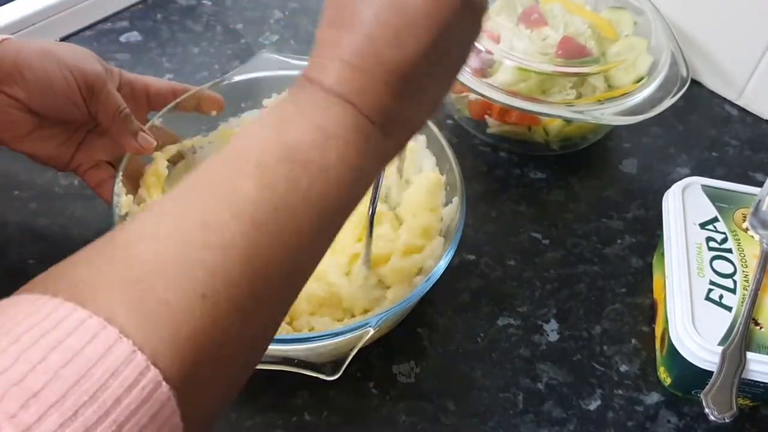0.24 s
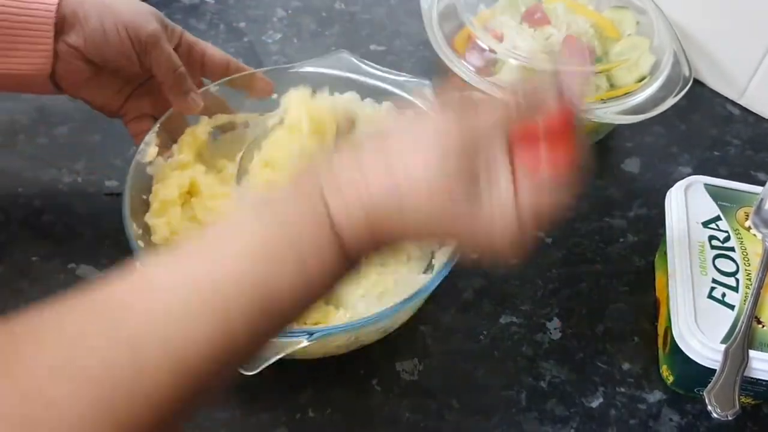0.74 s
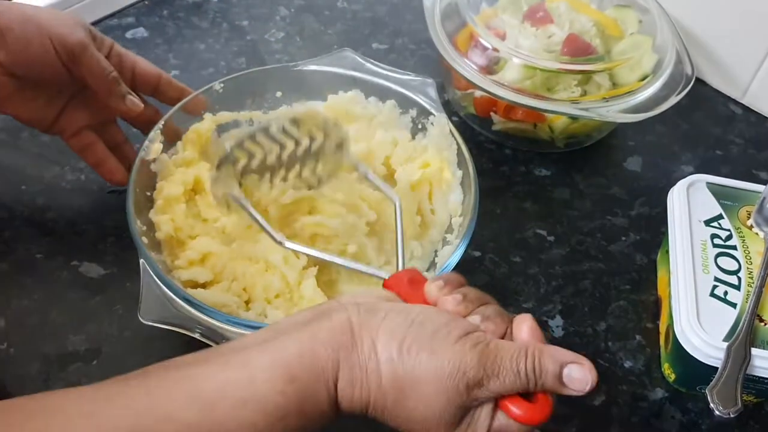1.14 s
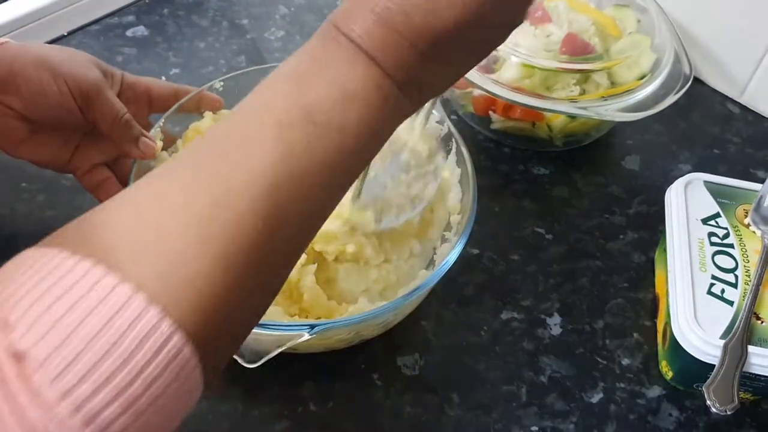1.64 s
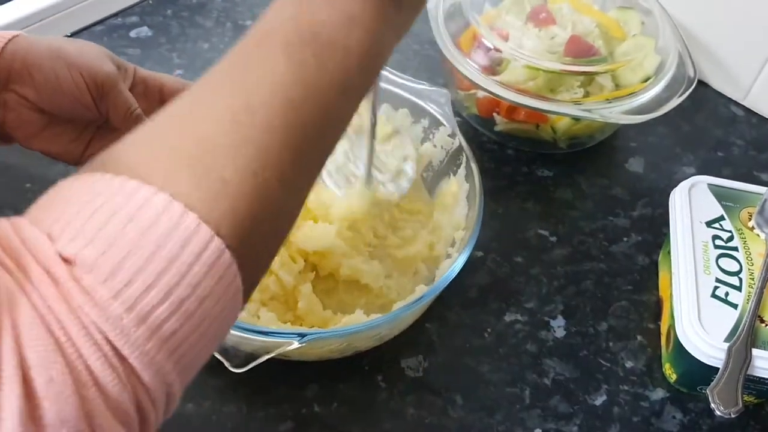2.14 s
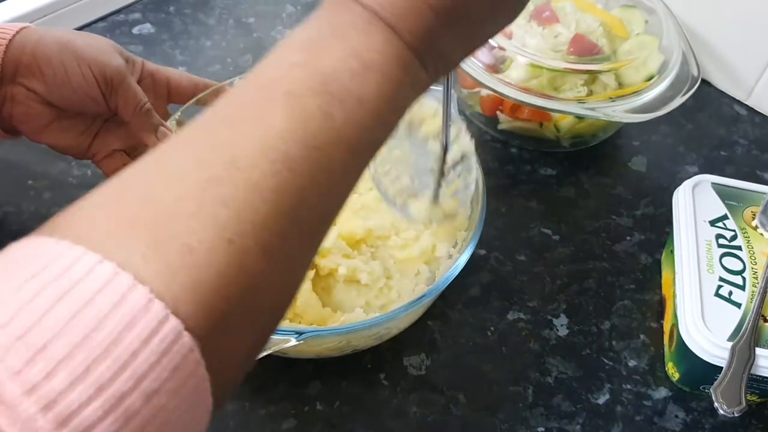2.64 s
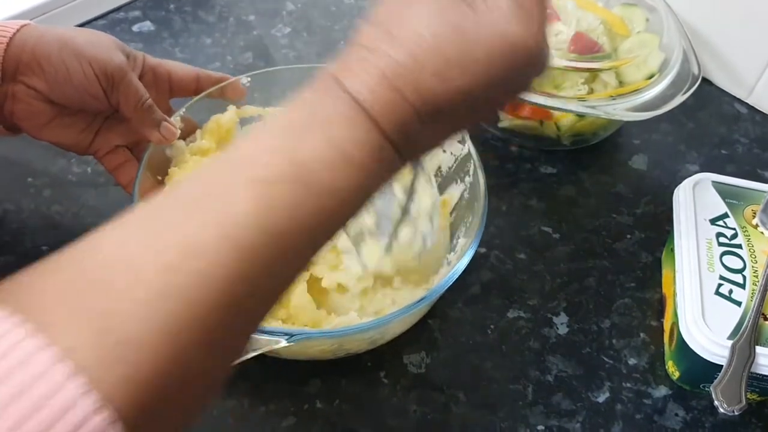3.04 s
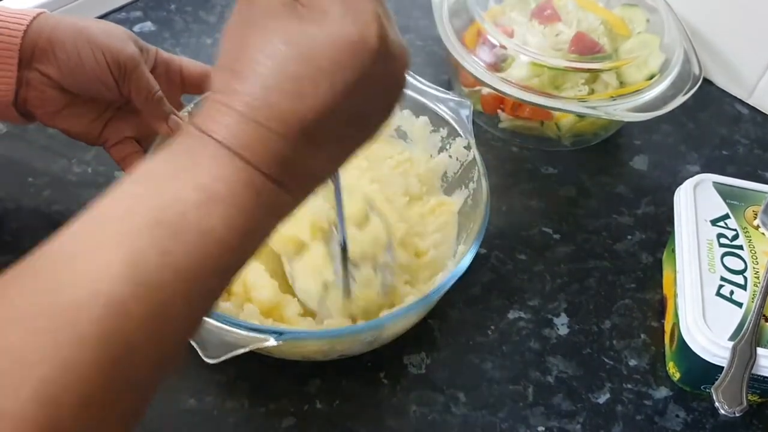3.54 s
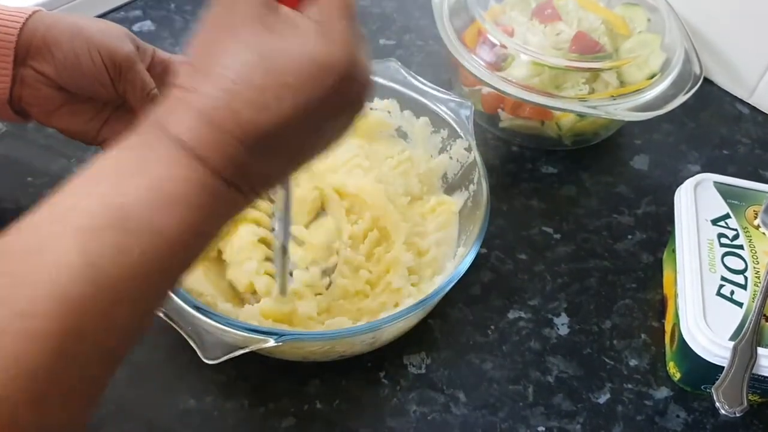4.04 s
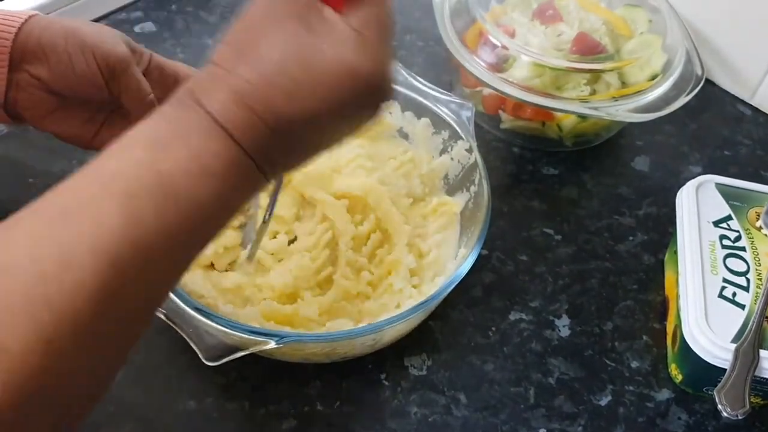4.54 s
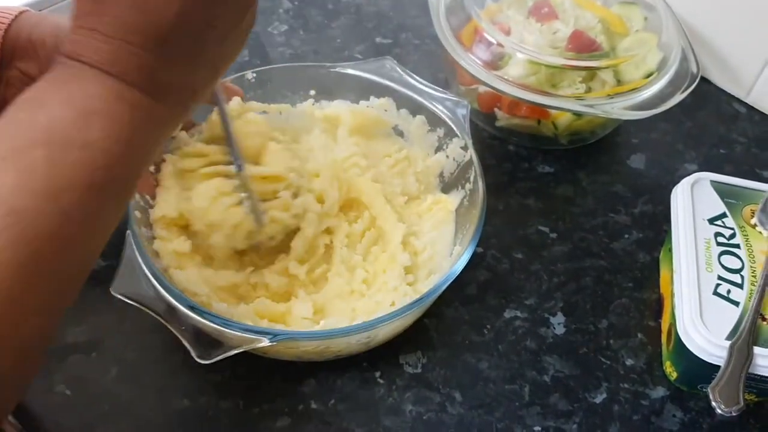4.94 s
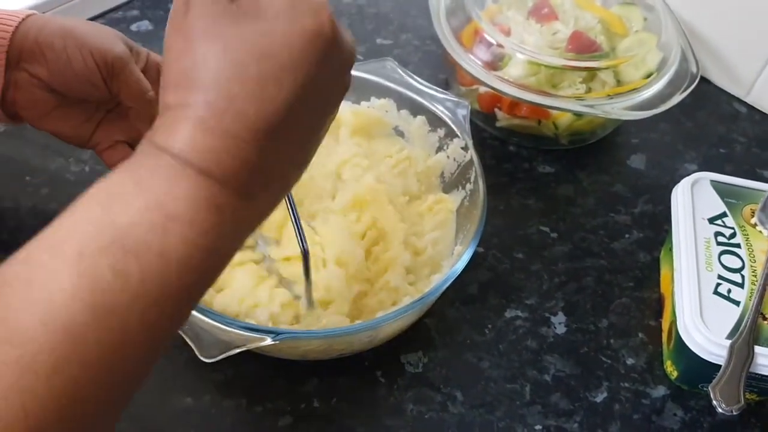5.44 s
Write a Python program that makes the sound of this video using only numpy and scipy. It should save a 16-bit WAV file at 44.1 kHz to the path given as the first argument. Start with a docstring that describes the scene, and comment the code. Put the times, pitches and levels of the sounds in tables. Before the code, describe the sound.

Boiled potatoes mashed in a glass bowl with a steel masher: dull thumps, a few glassy clinks and soft wet squelches in a quiet kitchen.

```python
"""In a small kitchen, boiled potatoes are mashed in a glass bowl on the worktop, close to a two-port microphone.
The steel masher thumps through the potato into bowl and worktop: filtered bursts, dying tones and a low swing.
Steel clinks on glass are bursts with dying tones; wet mash squelches as random clicks and tiny ringing bubbles.
Air pockets pop as a snap plus a short note. Each of these gets a short room echo of shaped noise.
Underneath lies faint kitchen air: noise coloured into a low hum and a thin hiss."""
import sys
import numpy as np
from scipy import signal
from scipy.fft import rfft, irfft
from scipy.io import wavfile
from scipy.ndimage import uniform_filter1d

SR = 44100
rng = np.random.default_rng(int(sys.argv[2]) if len(sys.argv) > 2 else 0)


def bounce(signal):
    """Save signal as a 16-bit WAV file at the path given by the first command-line argument."""
    frames = np.transpose(np.atleast_2d(signal))
    limited = np.clip(frames, -1, 1)
    pcm = np.round(limited * 32767).astype(np.int16)
    wavfile.write(sys.argv[1], SR, pcm)


N = 251370  # length of the scene in samples
HZ = np.fft.rfftfreq(8192, 1 / SR)  # frequencies at which filter gains are given
T = np.arange(SR * 3 // 5) / SR  # time within one short sound, in seconds


def amp(db):
    """Turns decibels into a gain."""
    return 10 ** (np.asarray(db) / 20)


def read(points, hz):
    """Reads between the points of a (f/Hz, value) table, on a log-frequency axis."""
    f, value = np.transpose(points)
    return np.interp(np.log(hz + 1), np.log(f + 1), value)


def add(mix, s, sound):
    """Lays a stereo sound into the mix, starting at s seconds."""
    start = max(round(s * SR), 0)
    part = mix[:, start:][:, :sound.shape[1]]
    part += sound[:, :part.shape[1]]  # writes into the mix itself


def colour(x, db):
    """Filters x with the gain db over HZ, without sounding ahead of time (minimum phase)."""
    cepstrum = irfft(db * np.log(10) / 20)
    half = len(cepstrum) // 2
    # folding the second half onto the first makes the filter causal
    cepstrum[1:half] *= 2
    cepstrum[half + 1:] = 0
    response = irfft(np.exp(rfft(cepstrum)))[None, :half]
    return signal.oaconvolve(x, response, axes=1)[:, :x.shape[1]]


def band_rms(x, band):
    """Measures the level of a stereo sound's centre within a band (low Hz, high Hz)."""
    sos = signal.butter(2, band, "band", fs=SR, output="sos")
    return np.std(signal.sosfilt(sos, x.mean(0)))


def diffuse(size):
    """Noise from all sides: alike at both ports in the bass, unrelated in the treble."""
    port_gap_m, sound_speed_m_per_s = 0.17, 343
    a, b = rfft(rng.standard_normal((2, size)))
    same = np.sinc(2 * np.fft.rfftfreq(size, 1 / SR) * port_gap_m / sound_speed_m_per_s)
    near, apart = np.sqrt((1 + same) / 2), np.sqrt((1 - same) / 2)
    return irfft([near * a + apart * b, near * a - apart * b], size)


def kitchen(direct_db, early_db, early_s, tail_db, lag_s):
    """Direct sound, quick scatter from worktop and tiles, and a tail that dies band by band."""
    # how long the room takes to die away by 60 dB: (f/Hz, t60/s)
    room_t60 = [(60, 0.34), (150, 0.19), (500, 0.31), (1500, 0.27), (2500, 0.26), (4000, 0.28), (8000, 0.2),
                (16000, 0.53)]
    hz, t, z = signal.stft(diffuse(len(T)), SR, nperseg=256)
    fading = z * amp(-60 * t / read(room_t60, hz)[:, None])
    tail = signal.istft(fading, SR, nperseg=256)[1][:, :len(T)]
    tail *= 1 - np.exp(-T / 0.0026)
    early = diffuse(len(T)) * np.exp(-T / early_s) * (1 - np.exp(-T / 0.0013))
    # the second port hears the direct sound lag_s later
    direct = np.sinc((T - np.array([[0], [abs(lag_s)]])) * SR - 2)
    parts = [(direct_db, direct), (early_db, early), (tail_db, tail)]
    paths = sum(amp(db) * p / np.linalg.norm(p[0]) for db, p in parts)
    # many paths together leave a fine ripple but no broad colour
    power = uniform_filter1d((abs(rfft(paths, 8192)) ** 2).mean(0), size=21)
    return colour(paths, -10 * np.log10(power))


def air():
    """Low hum and thin hiss of the still kitchen: coloured noise whose level swells slightly."""
    # how strong the noise is at each pitch, before its overall level is set: (f/Hz, density/dB per Hz)
    air_colour = [(20, -14), (40, -6), (58, 6), (80, -6.5), (120, -5.5), (180, -12.5), (300, -10),
                  (500, -21), (780, -24.5), (950, -38), (1200, -29), (1500, -22.5), (2200, -21.5),
                  (3200, -31), (6000, -35), (8400, -30), (9600, -47), (16000, -48)]
    level_db, swell_db = -62, 1.0  # average level; size of each slow wave in it
    spectrum = rfft(diffuse(N)) * amp(read(air_colour, np.fft.rfftfreq(N, 1 / SR)))
    noise = irfft(spectrum, N)
    t = np.arange(N) / SR
    swell = sum(np.sin(2 * np.pi * (f * t + rng.random())) for f in np.geomspace(.4, 5, 8))
    return amp(level_db + swell_db * swell) * noise / noise.std()


def pops():
    """A larger air pocket bursts: a wet snap centred on a short note."""
    # air pockets bursting in the mash: (t/s, peak level/dB, note f/Hz, note t60/s)
    air_pockets = [(0.023, -50, 1852, 0.073), (0.2185, -44, 3556, 0.071), (0.997, -43, 3170, 0.016),
                   (1.1004, -47.5, 5400, 0.011), (1.9079, -29.5, 2560, 0.022), (2.4104, -53.5, 1837, 0.06),
                   (3.2176, -59, 1336, 0.038), (3.259, -49, 3740, 0.02), (3.502, -42.5, 2900, 0.062),
                   (3.7788, -42.5, 2160, 0.021), (3.8153, -40.5, 3190, 0.054), (3.8788, -40, 3730, 0.017),
                   (3.978, -55, 2950, 0.019), (4.2692, -37, 3290, 0.0073), (4.2951, -43, 2370, 0.034),
                   (4.546, -49, 1332, 0.066), (4.753, -50.5, 8230, 0.023), (4.802, -48.5, 1497, 0.086),
                   (4.958, -52, 1420, 0.05), (5.1283, -43.5, 3330, 0.019), (5.4778, -38.5, 2644, 0.066)]
    out = np.zeros((2, N))
    for s, db, hz, t60 in air_pockets:
        note = amp(-6 - 60 * T / t60) * np.sin(2 * np.pi * hz * T)
        snap = np.exp(-T / 0.00072) * rng.standard_normal(len(T))
        # the snap loses 13 dB per octave away from the note
        burst = note + colour(snap[None], 7 - 13 * abs(np.log2((HZ + 100) / hz)))
        room = kitchen(direct_db=-9.0, early_db=3.5, early_s=0.0019, tail_db=-8.5, lag_s=.00005)
        sound = signal.fftconvolve(burst, room, axes=1)[:, :len(T)]
        add(out, s, amp(db) * sound / abs(sound).max())
    return out


def crackle(per_s, spread_db):
    """Random clicks, most of them near the smallest size and a few larger."""
    size = amp(spread_db * np.minimum(rng.exponential(1, N), 4))
    happens = rng.random(N) < per_s / SR
    return size * rng.choice([-1, 1], N) * happens


def bubbles(per_s, cycles, count):
    """Tiny cavities open in the mash; each rings for a few cycles, rising in pitch."""
    out = np.zeros(N)
    t = T[:SR // 50]
    for hz in np.linspace(1500, 7000, count) * rng.uniform(.94, 0.98, count):
        grain = np.exp(-t * hz / cycles) * np.sin(2 * np.pi * hz * t * (1 + 6 * t))
        clicks = crackle(per_s / count, spread_db=2.5)
        out += signal.oaconvolve(clicks, grain / np.linalg.norm(grain))[:N]
    return out


def squeeze_gains():
    """Each squeeze sets in, swells or slackens while the plate moves, then dies away: (fizz, smack) gains."""
    # mash squeezing through the plate, with fizz and smack levels relative to their layers:
    # (start t/s, length/s, attack/s, fine fizz level/dB, wet smack level/dB, swell from start to end/dB)
    squeezes = [(0.152, 0.11, 0.095, -69.5, -61, -5.5), (0.276, 0.057, 0.019, -78, -64, 4),
                (0.388, 0.18, 0.16, -75, -64, 13.5), (0.948, 0.049, 0.011, -73, -82, -3),
                (1.068, 0.053, 0.036, -75, -92, -6.5), (1.61, 0.13, 0.03, -72.5, -62, 6.5),
                (1.787, 0.059, 0.01, -81, -70, 2), (1.878, 0.04, 0.024, -69, -53.5, 3),
                (2.158, 0.027, 0.017, -69, -63, -3), (2.36, 0.096, 0.047, -68.5, -69, 5),
                (2.831, 0.16, 0.02, -74, -74, 15), (3.213, 0.12, 0.005, -70.5, -57.5, 12),
                (3.351, 0.022, 0.03, -59.5, -63.5, -9.5), (3.457, 0.062, 0.011, -63.5, -58, 5.5),
                (3.748, 0.066, 0.004, -63.5, -63, -1.5), (3.853, 0.018, 0.022, -72, -57.5, -0.5),
                (3.947, 0.076, 0.033, -71.5, -61.5, 9.5), (4.255, 0.13, 0.051, -64, -54.5, -8),
                (4.423, 0.14, 0.062, -69, -62, 3.5), (4.869, 0.1, 0.019, -76, -69, 19.5),
                (5.029, 0.12, 0.024, -66, -62.5, 1.5), (5.418, 0.23, 0.0065, -71, -63.5, 1)]
    fade_db_per_s = np.array([[277.5], [322]])  # fizz and smack, once the plate stops
    gains = np.zeros((2, N))
    for s, length, attack_s, fizz_db, smack_db, swell_db in squeezes:
        attack = np.minimum(T / attack_s, 1)
        pressure_db = swell_db * (np.minimum(T / length, 1) - .5)
        release_db = np.maximum(T - length, 0) * fade_db_per_s
        level_db = np.array([[fizz_db], [smack_db]]) + pressure_db - release_db
        add(gains, s, attack * amp(level_db))
    return gains


def wander(shape, size):
    """Random values smoothed along each axis, then scaled to a spread of one."""
    drift = rng.standard_normal(shape)
    for axis, width in enumerate(size):
        for _ in range(2):
            drift = uniform_filter1d(drift, width, axis)
    return drift / drift.std()


def shifting(x, patchy_db):
    """Cavities in the mash change shape, so the colour of the squelch keeps moving."""
    z = signal.stft(x, SR, nperseg=256)[2]
    z *= amp(patchy_db * wander(z.shape[1:], size=(4, 9)))
    return signal.istft(z, SR, nperseg=256)[1][:, :N]


def squelch():
    """Wet starch films tear with a fine fizz; larger cavities smack open and strands snap."""
    # colour of starch films tearing: (f/Hz, relative level/dB)
    fizz_colour = [(900, -19), (2000, -19), (4000, -2), (6000, 2.5), (8500, 5.5), (9700, -4.5), (12500, 4),
                   (16000, -8)]
    # colour of cavities smacking open: (f/Hz, relative level/dB)
    smack_colour = [(200, -33), (600, 0), (1000, -16), (1400, -6), (2300, -1.5), (3600, -2.5), (5500, -14),
                    (9000, -6), (16000, -35)]
    # colour of a strand of mash parting: (f/Hz, relative level/dB)
    snap_colour = [(700, -31), (1700, -6.5), (2800, 3), (7000, 2.5), (10000, -3), (16000, -16.5)]
    out = np.zeros((2, N))
    fizz_band, smack_band = (9500, 15500), (1400, 4500)  # Hz, where each layer's level is set
    fizzing, smacking = squeeze_gains()
    # grains, colour, layer level in dB, gain over time, band
    layers = [(crackle(per_s=6000, spread_db=8.0), fizz_colour, -1, fizzing, fizz_band),
              (bubbles(per_s=1800, cycles=4.1, count=30), smack_colour, -2, smacking, smack_band),
              (crackle(per_s=190, spread_db=5.0), snap_colour, -6, smacking, smack_band)]
    for grains, spectrum, db, gain, band in layers:
        close = kitchen(direct_db=-2, early_db=-2, early_s=0.007, tail_db=-9.5, lag_s=.00005)
        room = colour(close, read(spectrum, HZ))
        # the grains without their squeezes give the level to divide by
        steady = signal.oaconvolve(grains[None], room, axes=1)[:, :N]
        squeezed = signal.oaconvolve((grains * gain)[None], room, axes=1)[:, :N]
        out += amp(db) / band_rms(steady, band) * squeezed
    return shifting(out, patchy_db=2.1)


def ring(modes, rise_s, spread_hz):
    """Dying tones of alternating sign; the higher ones reach the two ports out of step."""
    out = np.zeros((2, len(T)))
    for k, (hz, db, t60) in enumerate(modes):
        skew = min((hz / spread_hz) ** 2, 1) * rng.uniform(.55, .85) * rng.choice([-1, 1])  # radians
        tone = np.sin(2 * np.pi * hz * T + np.array([[skew], [-skew]]))
        out += (-1) ** k * amp(db - 60 * T / t60) * tone
    return out * (1 - np.exp(-T / rise_s))


def contact(corner_hz, peak_db):
    """The springy contact lifts or dips the sound at its corner and takes out the treble above: dB over HZ."""
    peak = peak_db * np.exp(-(2 * np.log2((HZ + 1) / corner_hz)) ** 2)
    return peak - 10 * np.log10(1 + (HZ / corner_hz) ** 4)


def clinks():
    """The steel plate hits the glass; where it touches decides which of its resonances speaks."""
    # steel on glass: (t/s, force level/dB, contact cut-off f/Hz, masher resonance f/Hz, its lift/dB, bowl ring/dB)
    taps = [(1.554, -14, 12100, 3800, 8, -9.5), (1.598, -37, 4000, 2400, -1, 19.5),
            (2.182, -13.5, 5550, 898, 15.5, -6), (2.201, -26, 6070, 3920, -13, -13),
            (2.683, -2, 10200, 1940, 12.5, -1), (2.695, -18, 3030, 1800, -2, -23)]
    # tones of the glass wall struck by steel, t60 before the mash damps it: (f/Hz, relative level/dB, t60/s)
    glass_modes = [(269.9, -22.5, .14), (466, -33.5, 0.17), (792, -31.5, 0.29), (1280, -36.5, 0.14),
                   (1415.4, -15.5, 0.12), (1670, -33, 0.077), (1460, -30.5, 0.071), (1960, -34, 0.12),
                   (2527, -25.5, .12), (2621, -21.5, 0.13), (3000, -47.5, 0.065), (3460, -28.5, 0.12),
                   (3510, -32.5, 0.11), (3780, -32, .07), (4700, -33, .07), (4950, -28, 0.073),
                   (5440, -30.5, 0.068)]
    # broad colour of the struck glass: (f/Hz, relative level/dB)
    glass_body = [(40, -14), (170, 16), (400, 7.5), (780, 8), (980, -0.5), (1400, 18.5), (2000, 11),
                  (2600, 7.5), (3600, 11), (4300, 4.5), (7000, 0), (8500, 3.5), (10000, -3), (16000, -8.5)]
    out = np.zeros((2, N))
    # the mash damps the glass, so it is the room that carries the ring on
    damped = [(hz, db, min(t60, .115)) for hz, db, t60 in glass_modes]
    for s, db, corner_hz, steel_hz, lift_db, ring_db in taps:
        room = kitchen(direct_db=-20.0, early_db=-1.5, early_s=0.0023, tail_db=-3.5, lag_s=0.00018)
        wall = ring(damped, rise_s=0.001, spread_hz=1400)
        echoed = signal.fftconvolve(wall, room, axes=1)[:, :len(T)]
        wall = amp(-6.5) * wall + amp(-4.5) * echoed
        body = colour(room, read(glass_body, HZ)) + amp(ring_db) * wall
        steel = lift_db * np.exp(-(np.log2((HZ + 1) / steel_hz) / 0.61) ** 2)
        add(out, s, amp(db) * colour(body, contact(corner_hz, peak_db=3) + steel))
    return out


def push(hz, delay_s):
    """The arm's weight arrives just after contact: one low swing of the worktop."""
    u = np.pi * hz * (T - delay_s)
    return (2 * u ** 2 - 1) * np.exp(-u ** 2)


def thumps():
    """The masher bottoms out and drives the bowl against the worktop."""
    # downward blows; the cut-off is low when potato cushions the blow:
    # (t/s, relative force level/dB, contact cut-off f/Hz, weight in the bass/dB)
    blows = [(0.165, -31, 298, 4), (0.207, -34, 232, -11), (0.458, -21.5, 846, -9), (0.559, 1, 3300, -2.5),
             (1.555, -30, 505, 8), (1.598, -19, 1120, -26.5), (1.83, -39, 403, 10.5),
             (1.9408, -4, 3000, -6.5), (1.948, -8.5, 1190, 2.5), (2.766, -25.5, 219, -8.5),
             (2.919, -34, 454, 4), (2.992, -13.5, 578, -1), (3.294, -45, 450, 14.5), (3.463, -31, 680, 6),
             (3.552, -4.5, 2710, 0.5), (3.999, -38.5, 707, 13.5), (4.266, -48, 587, 19),
             (5.288, -44, 286, -13), (5.476, -38, 307, -21.5), (5.662, -38.5, 377, 9.5)]
    # tones of the bowl standing on the worktop: (f/Hz, relative level/dB, t60/s)
    worktop_modes = [(54.4, -30, 0.46), (97.5, -15, 0.14), (113.5, -27.5, 0.21), (152.4, -13.5, 0.16),
                     (199, -23, 0.054), (203.6, -28, 0.28), (254.6, -31.5, 0.28), (309, -30.5, 0.24),
                     (350, -34.5, 0.3), (390, -35.5, 0.12), (500.7, -29.5, .2), (552.2, -23, 0.16),
                     (637, -24, 0.082), (726, -28.5, 0.13), (822, -37.5, 0.23), (1159, -39, 0.38),
                     (1300, -37, 0.37), (3270, -35.5, .14)]
    # colour of its crowd of short overlapping tones: (f/Hz, relative level/dB)
    worktop_body = [(25, -11.5), (60, 17), (110, 35.5), (200, 32.5), (430, 22.5), (600, 23.5), (900, 17.5),
                    (1400, 20.5), (2100, 13.5), (3100, 7), (4200, 2), (8000, 5), (10000, -5), (16000, -5.5)]
    out = np.zeros((2, N))
    for s, db, corner_hz, weight_db in blows:
        room = kitchen(direct_db=-16.5, early_db=0, early_s=0.0053, tail_db=-3, lag_s=.0001)
        body = colour(room, read(worktop_body, HZ))
        body = body + ring(worktop_modes, rise_s=.002, spread_hz=2100)
        body = body + amp(-13.5) * push(hz=139, delay_s=.006)
        weight = weight_db / (1 + (HZ / 280) ** 2)
        add(out, s, amp(db) * colour(body, contact(corner_hz, peak_db=-0.5) + weight))
    return out * amp(0) * 10 ** (np.array([[.4], [-.4]]) / 20)  # first port 0.8 dB louder than the second


def scene():
    """All that sounds at the worktop, over the air of the kitchen."""
    return air() + pops() + squelch() + clinks() + thumps()


def record(dry):
    """The microphone sheds the lowest rumble; then the recorder's band limit."""
    rumble_hz, edge_hz = 38, 15950
    lean = signal.sosfilt(signal.butter(3, rumble_hz, "high", fs=SR, output="sos"), dry)
    band_limit = signal.firwin(511, edge_hz, window=("kaiser", 9), fs=SR)
    return signal.oaconvolve(lean, band_limit[None], "same")


dry = scene()
out = record(dry)
bounce(out)
```